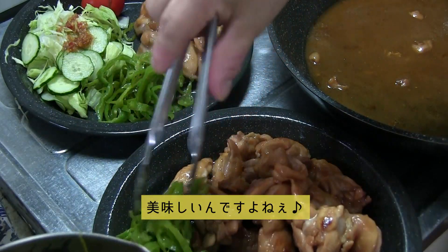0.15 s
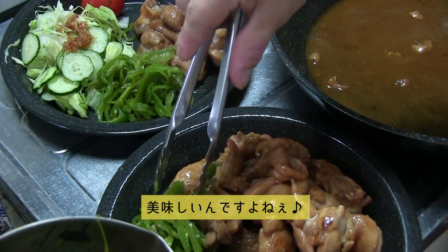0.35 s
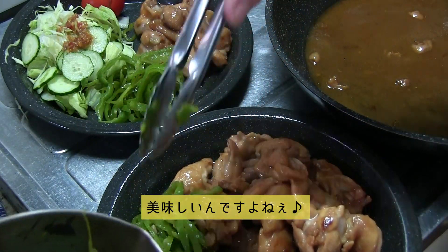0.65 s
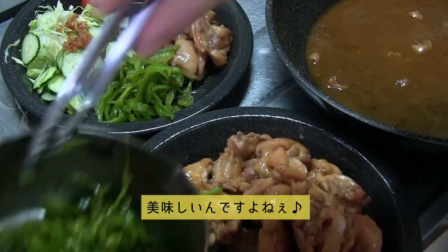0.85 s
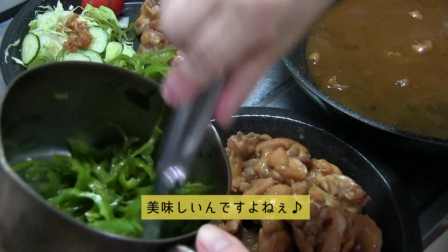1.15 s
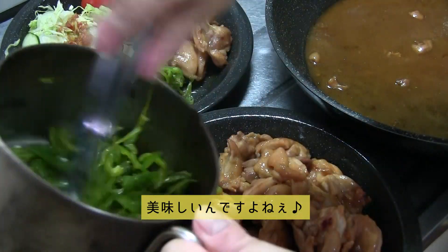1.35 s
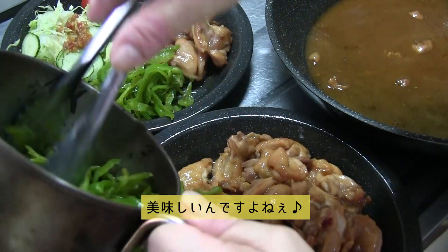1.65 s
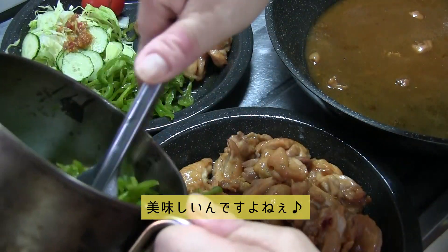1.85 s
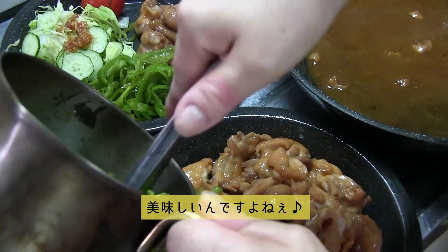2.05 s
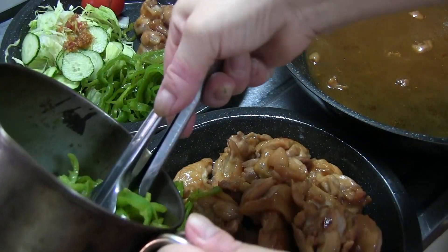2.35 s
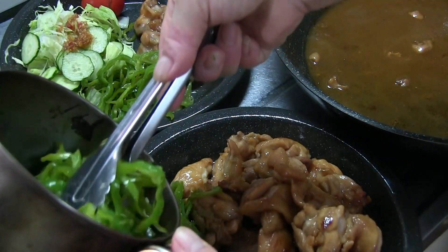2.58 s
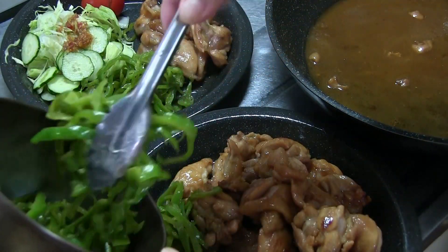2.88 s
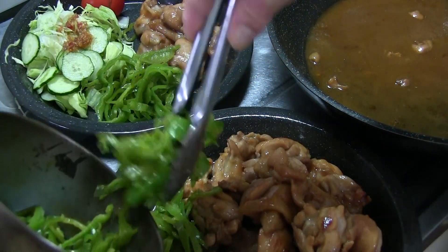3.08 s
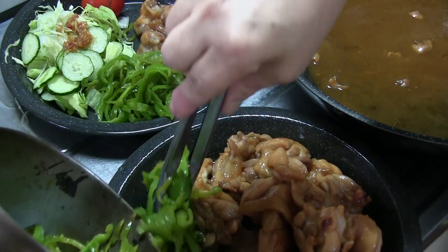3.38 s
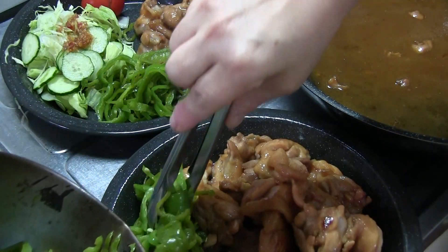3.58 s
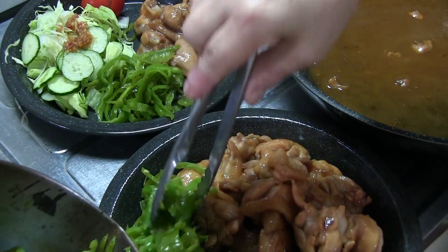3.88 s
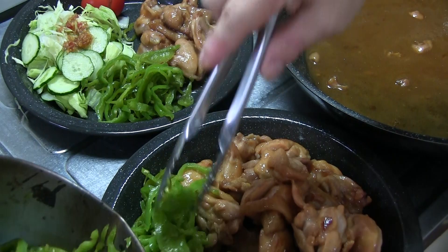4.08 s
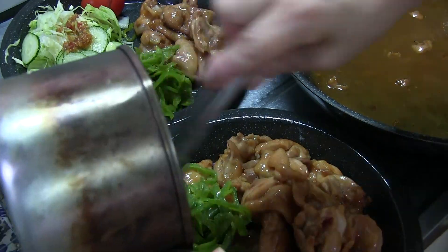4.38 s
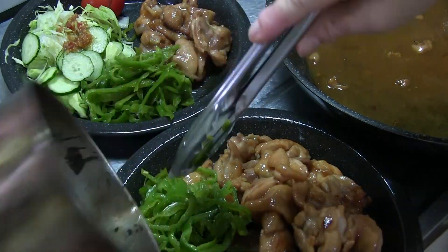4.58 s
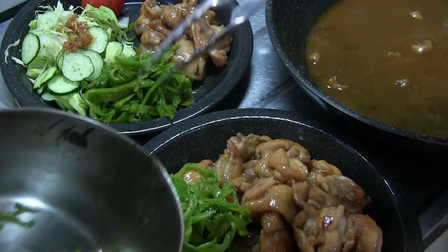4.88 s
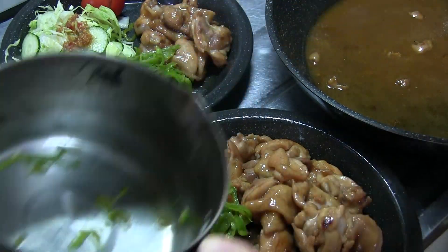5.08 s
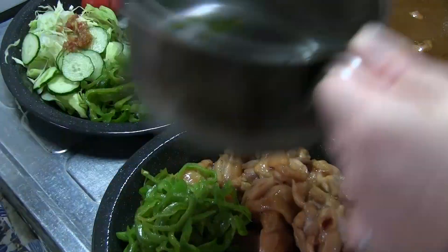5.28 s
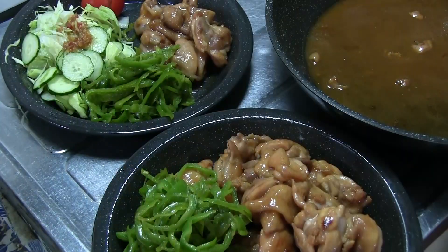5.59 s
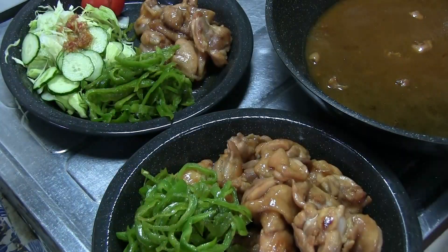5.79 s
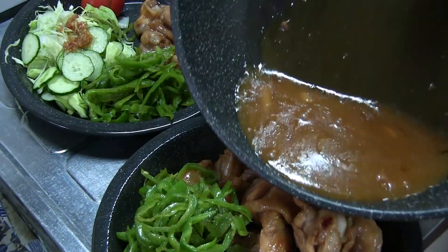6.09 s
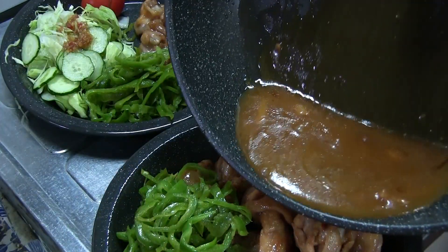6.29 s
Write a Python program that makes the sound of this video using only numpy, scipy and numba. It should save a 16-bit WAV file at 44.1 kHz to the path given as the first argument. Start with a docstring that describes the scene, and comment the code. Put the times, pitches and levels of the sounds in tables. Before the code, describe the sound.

Close stereo pickup of steel tongs gathering cooked peppers, slightly left of centre with short room reflections. A dull dish knock, bright clanks with gritty skids, and a harsh mid-pitched squeal fill the first half; then mostly fan hum, sparse hinge ticks and a single clattery scrape. A faint low drone comes and goes early; the fan steps up near the end.

```python
"""Tongs in a saucepan

Steel tongs gather cooked peppers in a hand-held steel saucepan, close by in a small kitchen, and touch a dish.
Taps ring banks of decaying modes; skids drive them with micro-slips; a squeal is a stick-slip tone with grit.
The sprung arms tick, a pepper squeaks as a falling sine, a fan of shaped noise and tones runs throughout, the
background steps up in level near the end, and a low drone comes and goes. Loud treble ducks the gain, which
creeps up."""
import sys
import numpy as np
from scipy import signal
from scipy.fft import rfft, irfft, next_fast_len
from scipy.io import wavfile
from scipy.ndimage import uniform_filter1d
from numba import njit

SR = 44100
rng = np.random.default_rng(int(sys.argv[2]) if len(sys.argv) > 2 else 0)


def unload_audio(sound):
    """Save the sound as a 16-bit wav file, at the path given as the first command line argument."""
    columns = np.transpose(np.atleast_2d(sound))
    # keep every value between -1 and 1, then stretch to whole-number steps
    steps = np.round(np.clip(columns, -1, 1) * 32767)
    wavfile.write(sys.argv[1], SR, steps.astype(np.int16))


N = 283989
TIME = np.arange(N) / SR
RING_SIZE = 2 ** 15  # samples
AGE = TIME[:RING_SIZE]

# saucepan and tong resonances: freq_hz, relative_level_db, undamped_t60_s
PAN_MODES = [(465, -8, .09), (525, -5, .1), (598, 1, .13), (810, -14, .08), (965, -13, .08),
             (1165, -4, .11), (1720, -18, .2), (2201, -4, .15), (2821, -7, .14), (2950, -8, .14),
             (3560, -4, .18), (3975, -8, .14), (4330, -14, .18), (5542, -9, .17), (5935, -12, .15),
             (6936, -9, .14), (7257, -12, .13), (8406, -15, .13)]
TONG_MODES = [(2455, -13, .14), (2935, -7, .11), (3351, -7, .1), (3545, -1, .17), (3690, -4, .13),
              (3832, -4, .12), (4150, -8, .13), (4420, -4, .15), (4665, -7, .18), (5150, -7, .12),
              (5307, -5, .15), (5520, 0, .22), (6920, -4, .14), (7110, -5, .13), (7300, -4, .15),
              (7660, -4, .17), (7900, -7, .12), (9310, -7, .16), (11200, -7, .14), (11550, -8, .15)]
# weak dense resonances between them: freq_hz, relative_density_db_per_hz
PAN_WASH = [(100, -46), (300, -31), (490, -6.5), (750, -13), (1150, -4.5), (1650, -10.5), (2500, -11),
            (3700, -3), (4800, -12.5), (7200, -15.5), (10000, -26), (16000, -23)]
TONG_WASH = [(200, -37), (520, -14.5), (1400, -24.5), (2600, -7.5), (3600, -2.5), (4080, -4), (4500, -2),
             (4900, -6), (5450, 0), (6250, -1), (7400, 0.5), (8600, -3), (11300, -3), (16000, -10)]


def undb(db):
    """Decibels to gain."""
    return 10 ** (np.asarray(db) / 20)


def unit(x):
    """Scale to unit energy."""
    return x / np.sqrt(np.sum(x ** 2))


def steady(x):
    """Scale to unit rms."""
    return x / np.sqrt(np.mean(x ** 2))


def along(points, hz):
    """Read (Hz, value) points on a log-frequency axis."""
    point_hz, value = np.transpose(points)
    return np.interp(np.log(hz), np.log(point_hz), value)


def colour(x, db_at):
    """Filter by a function that gives dB for each frequency."""
    size = next_fast_len(len(x) + RING_SIZE // 8)
    hz = np.maximum(np.arange(size // 2 + 1) * SR / size, 1)
    return irfft(rfft(x, size) * undb(db_at(hz)), size)[:len(x)]


def add(track, start_s, x):
    """Mix x into the track from start_s on."""
    start = int(start_s * SR)
    track[start:start + len(x)] += x[:N - start]


def waver(window_s, count=N):
    """Random wobble of rms 1: noise averaged over window_s."""
    return steady(uniform_filter1d(rng.standard_normal(count), max(int(window_s * SR), 1)))


def fade(t, t60_s):
    """Gain 1 until t = 0, then an exponential decay."""
    return np.exp(-np.log(1000) * np.maximum(t, 0) / t60_s)


def swell(t, attack_s, t60_s):
    """A bell-shaped rise to gain 1 at t = 0, then an exponential decay."""
    return np.exp(-(np.minimum(t, 0) / attack_s) ** 2) * fade(t, t60_s)


def hum(hz, wander_hz=1.17):
    """A tone of rms 1 whose pitch wanders by wander_hz rms."""
    phase = 2 * np.pi * np.cumsum(hz + wander_hz * waver(0.096)) / SR
    return np.sqrt(2) * np.sin(phase)


def fan(flutter_db=0.5):
    """Moving air coloured by the housing, plus motor tones; the bass is nearly alike on both sides."""
    fan_air = [(25, -12.5), (40, -19), (55, -9), (95, -1.5), (206, -3), (236, -9), (317, -3), (384, -7.5),
               (503, -11.5), (624, -6.5), (775, -13.5), (1600, -18), (2400, -23.5), (4000, -30),
               (12500, -39), (16000, -47)]  # air noise: freq_hz, relative_density_db_per_hz
    fan_housing = [(59, 11.7, 10.5), (102.6, 10.3, 5), (208, 12, 1.5), (321.8, 15, 6.5), (618.4, 17.2, 9),
                   (1160, 67, 0.5), (2046, 150, 3.5)]  # housing resonances: centre_hz, width_hz, lift_db
    fan_side = [(60, -21), (110, -16.5), (200, -19.5), (380, -9), (700, -5.5), (1290, -4), (2380, -4.5),
                (4400, -2.5), (8120, -5), (15000, -2.5)]  # stereo width: freq_hz, side_minus_mid_db
    fan_tones = [(58.5, -23), (86, -23), (120, -18), (206.5, -14.5)]  # motor: pitch_hz, level_re_air_db
    base_db, step_s, step_db = -39.5, 5.885, 4  # the background steps up abruptly near the end

    def air_db(f):
        housing_db = sum(db / (1 + (2 * (f - hz) / width) ** 2) for hz, width, db in fan_housing)
        return along(fan_air, f) + housing_db

    mid = colour(rng.standard_normal(N), air_db)
    side = colour(rng.standard_normal(N), lambda f: air_db(f) + along(fan_side, f))
    air = (mid + side * np.array([[1], [-1]])) / np.std(mid)
    motor = sum(undb(db) * hum(hz) for hz, db in fan_tones)
    flutter = np.interp(TIME, np.linspace(0, TIME[-1], 90), rng.standard_normal(90))
    level = undb(base_db + step_db * (TIME > step_s) + flutter_db * flutter)
    return level * (air + motor)


def drone(hz=207):
    """A low tone fades in, holds and fades out."""
    start_s, end_s, fade_s, level_db = 0.42, 2.32, 0.15, -48
    envelope = np.clip(np.minimum(TIME - start_s, end_s - TIME) / fade_s, 0, 1)
    return undb(level_db) * envelope * hum(hz)


def tail():
    """Unit-energy reverberation of the small room, dying fastest in the bass and the top."""
    room_t60 = [(200, 0.28), (1000, 0.35), (3000, 0.31), (8000, 0.29), (16000, 0.26)]  # kitchen decay: freq_hz, t60_s
    centres_hz = np.geomspace(200, 16000, 6)
    noise, out = rng.standard_normal(RING_SIZE), 0
    for hz, share in zip(centres_hz, np.eye(len(centres_hz))):
        def band_db(f):
            return 20 * np.log10(np.interp(np.log(f), np.log(centres_hz), share) + 1e-9)
        out = out + colour(noise, band_db) * fade(AGE, along(room_t60, hz))
    return unit(out * np.clip(AGE / 0.0093, 0, 1))  # 9.3 ms build-up


def kitchen(x, early_db=-8, late_db=-9, early_t60_s=0.014):
    """Quick sideways reflections off pan and counter widen the treble; the room's tail differs on each side."""
    early = undb(early_db) * unit(rng.standard_normal(RING_SIZE) * fade(AGE, early_t60_s))
    # surfaces this small reflect little bass
    early = signal.sosfilt(signal.butter(2, 800, "high", fs=SR, output="sos"), early)
    responses = [side * early + undb(late_db) * tail() for side in (1, -1)]
    return np.array([signal.fftconvolve(x, response)[:N] for response in responses])


def contact(hz, tilt_db_per_octave, favoured_hz, lift_db, octaves=0.16):
    """Harder contacts are brighter, and each contact point drives one region best (dB)."""
    tilt_db = tilt_db_per_octave * np.log2(np.maximum(hz, 300) / 4000)
    return tilt_db + lift_db * np.exp(-.5 * (np.log2(hz / favoured_hz) / octaves) ** 2)


def ring(modes, wash, ring_db, touch, t60_s, free=1):
    """Unit-energy answer of a body to a tap: clear modes over a dense crack; free < 1 damps the modes."""
    hz, db, mode_t60_s = np.transpose(modes)
    phase = rng.uniform(0, 2 * np.pi, (len(hz), 1))
    size = undb(db + contact(hz, *touch)) / np.sqrt(mode_t60_s)
    partials = np.sin(2 * np.pi * hz[:, None] * AGE + phase) * fade(AGE, free * mode_t60_s[:, None])
    clear = size @ partials
    crack = colour(rng.standard_normal(RING_SIZE), lambda f: along(wash, f) + contact(f, *touch))
    return unit(unit(crack * fade(AGE, t60_s)) + undb(ring_db) * unit(clear))


def tap_gain(db):
    """Gain for a unit-energy tap; db is its rms if packed into 10 ms."""
    return undb(db) * np.sqrt(SR / 100)


def peppers():
    """A wet pepper rubs on steel in the grip: a short, falling squeak."""
    # centre_s, half_length_s (to 1/e), centre_pitch_hz, glide_hz_per_s, peak_rms_db
    squeaks = [(3.127, 0.014, 2475, -2500, -41.5)]
    out = np.zeros(N)
    for centre_s, length_s, hz, glide, db in squeaks:
        t = TIME - centre_s
        tone = np.sqrt(2) * np.sin(2 * np.pi * (hz + glide * t / 2) * t)
        out += undb(db) * tone * np.exp(-(t / length_s) ** 2)
    return out


def hinge_ticks():
    """The sprung arms tick at their hinge, ringing the damped tongs."""
    tick_rows = [(0.8412, -42, -5), (1.3581, -46, -11.5), (1.869, -41.5, -3), (2.071, -46, -6),
                 (2.52, -49, -8), (3.667, -46, -9), (3.732, -54, 2), (4.1855, -48.5, -2),
                 (5.399, -33.5, 4.5)]  # start_s, level_db, tilt_db_per_octave
    hinge_hz, hinge_lift_db = 5930, 5
    out = np.zeros(N)
    for start_s, db, tilt in tick_rows:
        touch = (tilt, hinge_hz, hinge_lift_db)
        tick = ring(TONG_MODES, TONG_WASH, ring_db=-9, touch=touch, t60_s=0.048, free=0.43)
        add(out, start_s, tap_gain(db) * tick)
    return out


def dish_knocks():
    """The tips knock on the serving dish and ring its modes."""
    dish_modes = [(175.6, -7, 0.18), (282, -4.5, 0.15), (422, -5, 0.41), (598, -2.5, 0.3),
                  (1136, -0.5, 0.087), (1990, -10, 0.35), (2810, -5, 0.17), (3440, -10, .25),
                  (3808, -25, .3), (3980, -13, 0.15), (4548, -11, 0.15), (6770, -6.5, 0.09)]  # freq_hz, relative_level_db, t60_s
    dish_wash = [(80, -18), (250, -2.5), (620, 1), (900, -22), (1150, -10), (1600, -11.5), (2400, -13.5),
                 (4000, -4), (6000, -14), (9000, -16), (16000, -34)]  # dense resonances: freq_hz, relative_density_db_per_hz
    # start_s, level_db, tilt_db_per_octave, favoured_hz, lift_db, crack_t60_s
    dish_rows = [(0.4341, -17.5, -0.2, 250, 1, 0.15)]
    out = np.zeros(N)
    for start_s, db, *touch, t60_s in dish_rows:
        knock = ring(dish_modes, dish_wash, ring_db=-1.0, touch=touch, t60_s=t60_s)
        add(out, start_s, tap_gain(db) * knock)
    return out


def slips(count, per_s=2500, scatter_db=4):
    """Dense, uneven micro-slips of steel on steel, rms 1."""
    hit = rng.random(count) < per_s / SR
    sign = rng.choice([-1, 1], count)
    return steady(hit * sign * undb(scatter_db * rng.standard_normal(count)))


def skids(pan_tilt=-2, pan_lift_db=18, slide_tilt=-1, slide_hz=7350, slide_lift_db=4):
    """Micro-slips drive the tongs as a tip slides lightly, then tongs and pan as it presses and lifts."""
    # start_s, peak_s, slide_db, attack_s, release_t60_s, tong_peak_db, tong_tilt_db_per_octave,
    # tong_favoured_hz, tong_lift_db, pan_peak_db, pan_favoured_hz
    skid_rows = [(1.078, 1.159, -29.5, .045, .1, -19.5, 0, 3570, 7, -30, 2980),
                 (1.451, 1.472, -33, 0.015, 0.13, -19.5, -2, 2220, 14, -29.5, 1000),
                 (1.676, 1.723, -38, 0.016, 0.068, -20.5, 1, 4630, 10.5, -35, 1760),
                 (1.915, 1.947, -53, .02, 0.27, -31.5, .8, 12700, 2, -48, 5040),
                 (4.415, 4.521, -26.5, .024, 0.11, -18, 1.2, 2350, 6.5, -37, 1100)]
    slide_t60_s = 0.058  # light slide dies once the tip presses
    slide_touch = (slide_tilt, slide_hz, slide_lift_db)
    out = np.zeros(N)
    for start_s, peak_s, slide_db, attack_s, release_t60_s, tong_db, *touch, pan_db, pan_hz in skid_rows:
        t = start_s + AGE - peak_s
        loose = ring(TONG_MODES, TONG_WASH, ring_db=-1, touch=slide_touch, t60_s=0.035, free=0.44)
        light_slips = fade(t, slide_t60_s) * slips(RING_SIZE)
        add(out, start_s, signal.fftconvolve(light_slips, undb(slide_db) * loose))

        pan_touch = (pan_tilt, pan_hz, pan_lift_db)
        tongs = ring(TONG_MODES, TONG_WASH, ring_db=-9, touch=touch, t60_s=0.039, free=0.48)
        pan = ring(PAN_MODES, PAN_WASH, ring_db=-7, touch=pan_touch, t60_s=0.034, free=0.7)
        pressed_slips = swell(t, attack_s, release_t60_s) * slips(RING_SIZE)
        add(out, start_s, signal.fftconvolve(pressed_slips, undb(tong_db) * tongs + undb(pan_db) * pan))
    return out


def squeal(jitter=0.0064, lobe_radians=0.5, flicker_db=2.5, smear_radians=0.56):
    """Stick-slip locks near a wall mode of the pan: returns that tone (stereo) and the rasp of the slips."""
    overtones = [(2, -25.5), (3, -22.5), (4, -20), (5, -22.5), (6, -21.5), (7, -22), (8, -26.5), (9, -37.5),
                 (11, -28), (12, -28), (15, -26.5)]  # multiple, level_re_tone_db
    rasp_colour = [(500, -14.5), (1700, -2.5), (3600, -2.5), (5500, -6), (9000, -5), (11000, -11),
                   (15000, -12)]  # slip grit: freq_hz, relative_density_db_per_hz
    peak_s, tone_db, grit_db = 2.233, -2.2, -14
    attack_s, t60_s, grit_attack_s, grit_t60_s = 0.012, 0.3, 0.018, 0.23
    lift_s, lift_t60_s = 2.378, 0.15  # the tip lets go
    light_hz, sag_hz = 599, 17  # slip rate under a light touch, its drop under full pressure

    start_s = peak_s - 2 * (attack_s + grit_attack_s)
    t = start_s + AGE - peak_s
    pressure = swell(t, attack_s, t60_s) * fade(start_s + AGE - lift_s, lift_t60_s)
    hz = light_hz - sag_hz * pressure
    level = np.sqrt(2) * undb(tone_db) * pressure
    phase = 2 * np.pi * np.cumsum(hz) / SR
    tone, rasp = np.zeros((2, N)), np.zeros(N)
    # the wall's lobes swing against each other, so left and right hear different phases
    add(tone[0], start_s, level * np.sin(phase + lobe_radians))
    add(tone[1], start_s, level * np.sin(phase - lobe_radians))
    # slips are uneven: each overtone flickers in level and timing
    slip_phase = phase + 2 * np.pi * np.cumsum(jitter * hz * waver(0.0022, RING_SIZE)) / SR
    for multiple, db in overtones:
        offset = rng.uniform(0, 2 * np.pi) + smear_radians * waver(0.0057, RING_SIZE)
        flicker = undb(db + flicker_db * waver(0.015, RING_SIZE))
        add(rasp, start_s, level * flicker * np.sin(round(multiple) * slip_phase + offset))
    # a burst of grit at every slip
    cycle = slip_phase / (2 * np.pi) % 1
    bursts = rng.standard_normal(RING_SIZE) * np.exp(-cycle / 0.52)
    grit = steady(colour(bursts, lambda f: along(rasp_colour, f)))
    add(rasp, start_s, undb(grit_db) * swell(t, grit_attack_s, grit_t60_s) * grit)
    return tone, rasp


def pan_blows():
    """The tips strike the pan and both ring; the sprung tips land a second time."""
    # start_s, bounce_re_first_db, then for pan and again for tongs:
    # level_db, tilt_db_per_octave, favoured_hz, lift_db
    blow_rows = [(1.0663, -8, -22, -8, 850, 27, -14.5, -3, 2920, 11),
                 (1.4296, 2.5, -8, -0.74, 464, 4, -17.5, -3, 2600, 9.7),
                 (1.6665, -7, -32, 3, 1010, 12, -18.5, -1, 8850, 4),
                 (2.158, -4, -12.3, -4.3, 2150, 12, -20, -0.5, 6000, 6.8),
                 (4.4066, -1.5, -26, 1.5, 2050, 21, -16.5, -2.3, 4800, 6)]
    bounce_s = 0.004
    out = np.zeros(N)
    for start_s, bounce_db, *both in blow_rows:
        (pan_db, *pan_touch), (tong_db, *tong_touch) = np.split(np.array(both), 2)
        pan = ring(PAN_MODES, PAN_WASH, ring_db=3.5, touch=pan_touch, t60_s=0.061, free=0.89)
        add(out, start_s, tap_gain(pan_db) * pan)
        for land_s, db in (start_s, tong_db), (start_s + bounce_s, tong_db + bounce_db):
            tongs = ring(TONG_MODES, TONG_WASH, ring_db=-5.5, touch=tong_touch, t60_s=0.076, free=0.75)
            add(out, land_s, tap_gain(db) * tongs)
    return out


def scene(tone_room_db=-18):
    """The utensils work a little left of centre, over the fan and drone."""
    left_lean = [(250, 0), (600, 1), (1100, 3), (2200, 3.5), (4000, 1), (8000, 1.5)]  # utensil position: freq_hz, left_minus_right_db
    tone, rasp = squeal()
    steel = pan_blows() + dish_knocks() + hinge_ticks() + skids() + rasp + peppers()
    room = kitchen(steel + undb(tone_room_db) * tone.mean(axis=0))
    left, right = steel + tone + room
    left = colour(left, lambda f: along(left_lean, f) / 2)
    right = colour(right, lambda f: -along(left_lean, f) / 2)
    return np.array([left, right]) + fan() + drone()


@njit
def ride(over_db, knee_db, fall, recover):
    """Gain in dB that falls while the amplified sound is over the threshold and creeps up all the time."""
    gain_db, now = np.empty(len(over_db)), 0.
    for i in range(len(over_db)):
        excess = min(max((over_db[i] + now) / knee_db, 0.), 1.)
        now += (recover - fall * excess) / SR
        gain_db[i] = now
    return gain_db


def record(dry):
    """The recorder rides its gain by the treble, clips peaks at full scale and cuts the top."""
    sense_hz, sense_s, top_hz = 1030, 0.0059, 15850
    threshold_db, knee_db, fall_db_per_s, recover_db_per_s = -26, 5.0, 53.5, 1.87
    treble = signal.sosfilt(signal.butter(1, sense_hz, "high", fs=SR, output="sos"), dry)
    power = uniform_filter1d(np.mean(treble ** 2, axis=0), int(sense_s * SR))
    over_db = 10 * np.log10(np.maximum(power, 1e-12)) - threshold_db
    ridden = dry * undb(ride(over_db, knee_db, fall_db_per_s, recover_db_per_s))
    top_cut = signal.ellip(10, .2, 80, top_hz, fs=SR, output="sos")
    return signal.sosfilt(top_cut, np.clip(ridden, -1, 1))


dry = scene()
out = record(dry)
unload_audio(out)
```